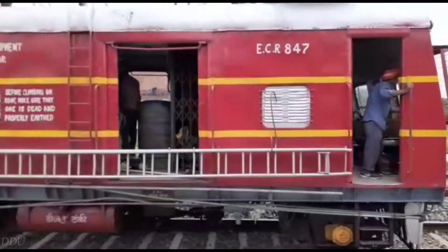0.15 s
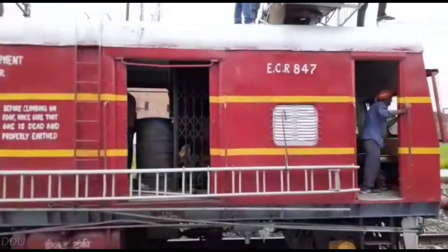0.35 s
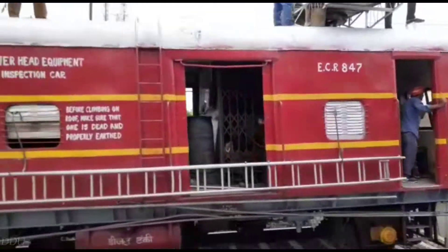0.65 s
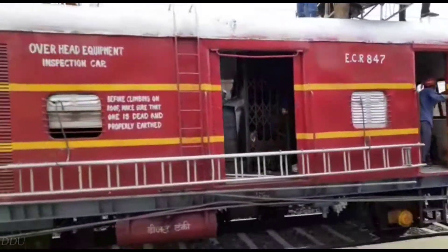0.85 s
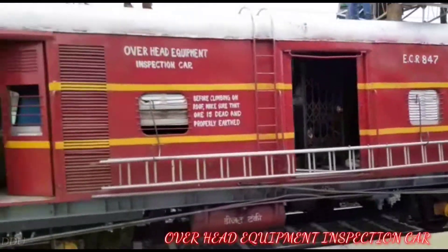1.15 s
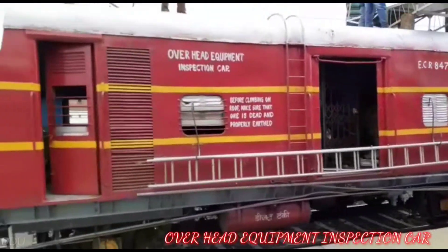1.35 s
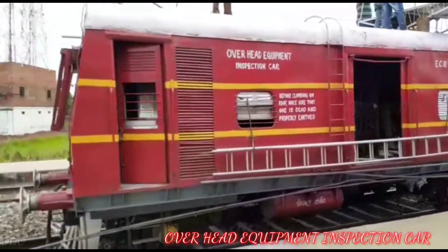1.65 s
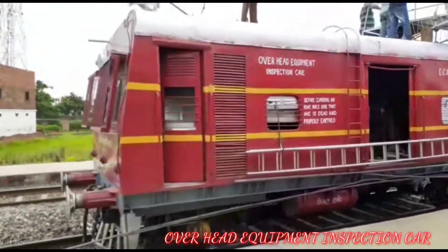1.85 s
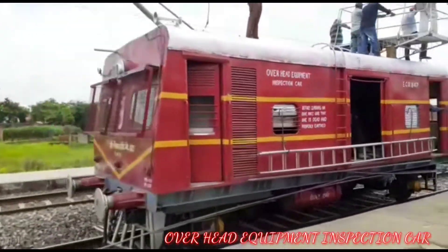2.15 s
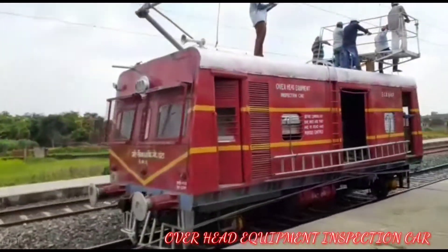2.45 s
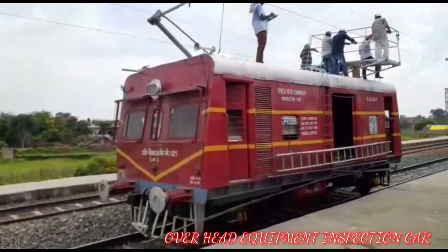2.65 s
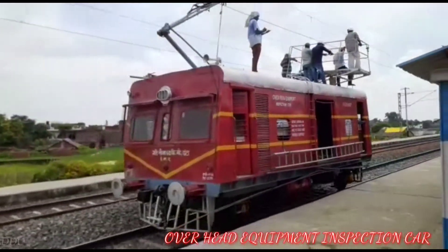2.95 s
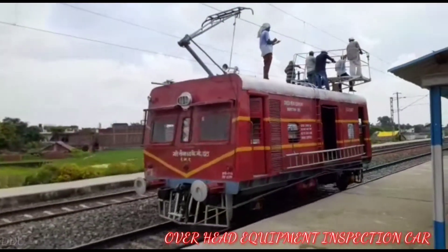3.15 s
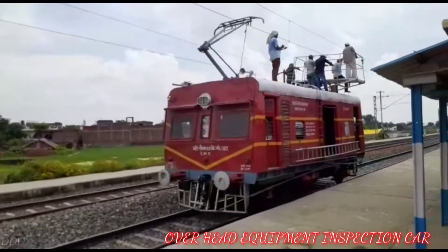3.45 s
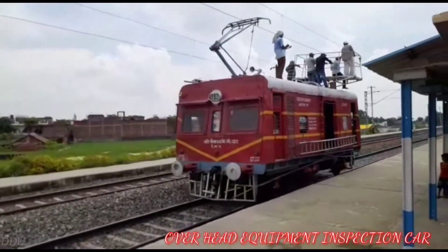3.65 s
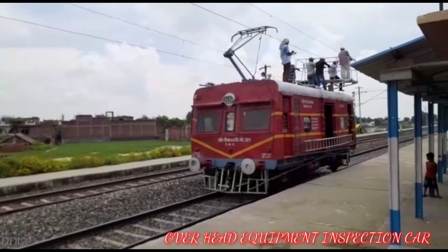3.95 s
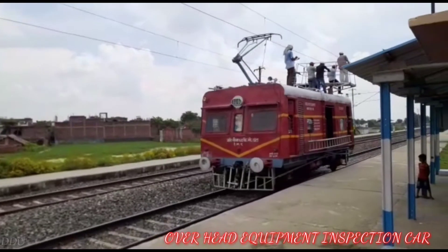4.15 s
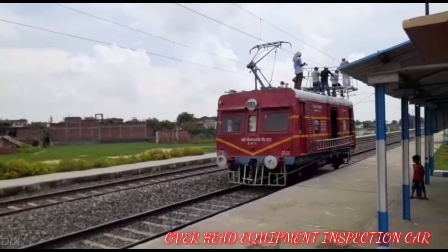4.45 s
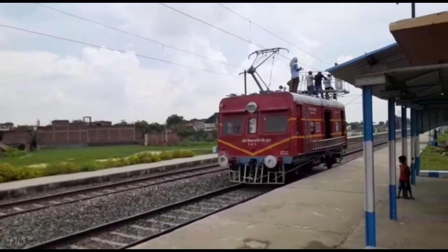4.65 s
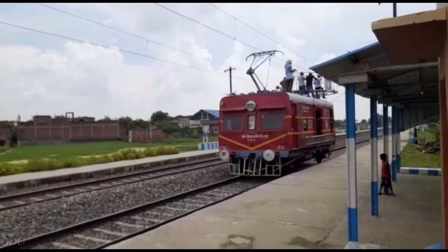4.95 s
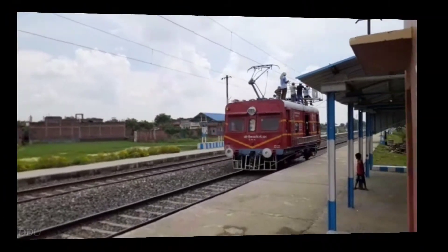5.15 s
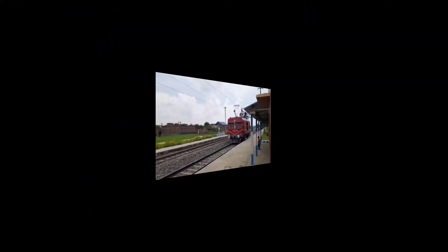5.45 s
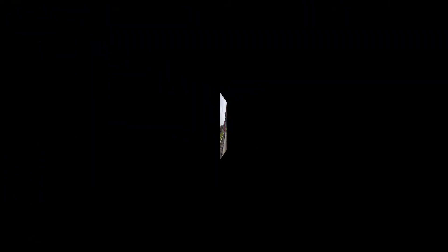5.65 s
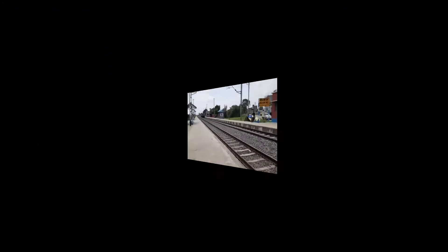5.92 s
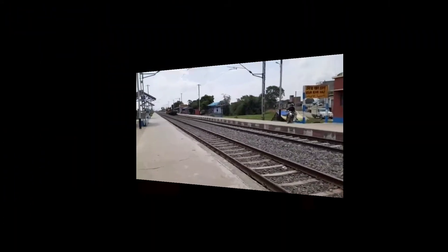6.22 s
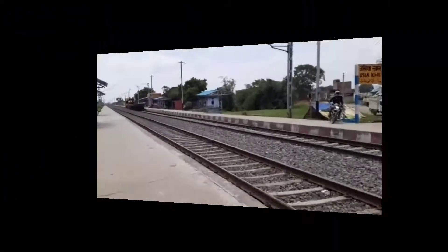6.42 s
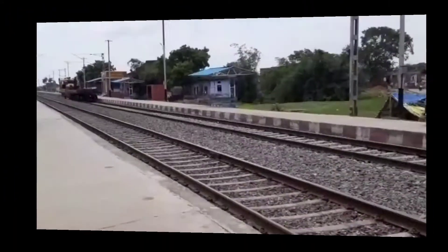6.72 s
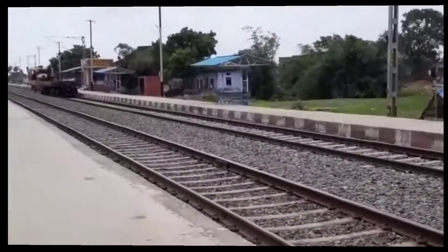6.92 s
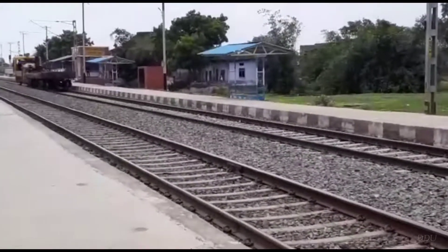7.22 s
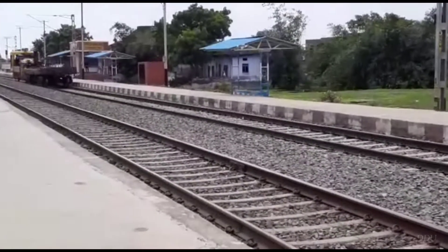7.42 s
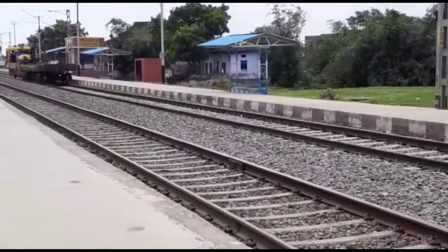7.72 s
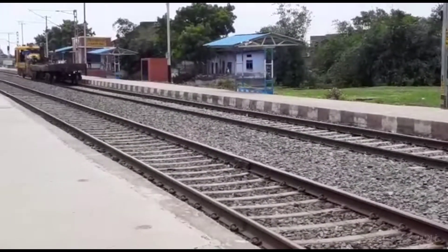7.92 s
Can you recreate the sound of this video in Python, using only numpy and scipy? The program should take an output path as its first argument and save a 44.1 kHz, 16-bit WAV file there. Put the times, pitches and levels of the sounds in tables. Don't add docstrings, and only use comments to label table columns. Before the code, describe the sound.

A diesel inspection vehicle passes very near small stereo microphones outdoors beside the rails: steady rapid firing throb, metallic panel roar, sliding wheel groan in the first second, irregular hissing air bursts. As it recedes, the chuffs thin out and light metallic ticks rattle over a cleaner bass hum. The sound fades out completely, then another track machine approaches from afar with sagging drones, lumpy roar and a brief puff of air.

```python
import sys
import numpy as np
from scipy import signal
from scipy.fft import rfft, irfft, next_fast_len
from scipy.io import wavfile
from scipy.ndimage import uniform_filter1d, map_coordinates

SR = 44100
rng = np.random.default_rng(int(sys.argv[2]) if len(sys.argv) > 2 else 0)


def materialize(psi):
    bounded = np.clip(np.atleast_2d(psi).T, -1, 1)
    quanta = np.round(bounded * 32767).astype(np.int16)
    wavfile.write(sys.argv[1], SR, quanta)


def volts_from_db(level):
    exponent = np.asarray(level, float) / 20
    return 10 ** exponent


N = 356328
CLOCK_S = np.arange(N) / SR
DROP_S, DROP_SAMPLES = 3.908, 1024


def unit(x):
    return x / np.sqrt(np.mean(x ** 2) + 1e-20)


def along(points, hz):
    f, v = np.transpose(points)
    return np.interp(np.log(hz + 1), np.log(f + 1), v)


def curves(rows):
    s, *columns = np.transpose(rows)
    gate = np.clip(np.minimum(CLOCK_S - s[0], s[-1] - CLOCK_S) / .03 + 1, 0, 1)
    return [np.interp(CLOCK_S, s, column) for column in columns] + [gate]


def bump(peak_s, width_s):
    return np.exp(-((CLOCK_S - peak_s) / width_s) ** 2)


def wobble(rate):
    return map_coordinates(rng.standard_normal(int(N * rate / SR) + 4), [np.arange(N) * rate / SR])


def filtered(x, response):
    m = next_fast_len(N + 8192)
    return irfft(rfft(x, m) * response(np.fft.rfftfreq(m, 1 / SR)), m)[..., :N]


def spread(pair, spectrum, alike, lean):
    def colour(hz):
        turn = np.arccos(np.clip(along(alike, hz), -1, 1)) / 2
        return volts_from_db(along(spectrum, hz)) * [np.cos(turn), np.sin(turn)]

    mid, side = filtered(pair, colour)
    stereo = np.array([mid + side, mid - side])
    return unit(filtered(stereo, lambda hz: volts_from_db(np.outer([.5, -.5], along(lean, hz)))))


def patchy(depth_db, size=512, count=5):
    z = signal.stft(rng.standard_normal((2, N)), nperseg=size)[2]
    field = uniform_filter1d(rng.standard_normal(z.shape[1:]), size=count, axis=0)
    field = uniform_filter1d(field, size=2 * count, axis=1)
    return signal.istft(z * volts_from_db(depth_db * unit(field)), nperseg=size)[1][:, :N]


def tone(hz, db, blur_hz, flutter_db):
    turns = np.cumsum(hz + blur_hz * wobble(25)) / SR
    return np.sqrt(2) * volts_from_db(db + flutter_db * wobble(14)) * np.sin(2 * np.pi * turns)


# pitch_hz, level_db (per Hz)
FAR_LOW = [(15, -49.5), (25, -18), (86, 1), (141, -9), (184, -6.5), (218, -15.5), (330, -8), (442, -16.5),
           (600, -19.5), (780, -44), (1320, -120)]
FAR_MID = [(260, -34), (450, -2.5), (530, -9), (680, -2.5), (894, 2), (1240, 0.5), (1340, 1.5),
           (1590, -3.5), (2260, -5.5), (2900, -16), (3770, -34), (6380, -120)]
FAR_UPPER = [(1470, -36), (2500, -7), (3560, -4), (4980, -4.5), (5560, -7.5), (7500, -23), (9750, -45),
             (16500, -120)]
FAR_TREBLE = [(3820, -31.5), (6500, -4), (7660, -6.5), (12100, 0.5), (15600, -7)]
# pitch_hz, left_right_likeness (-1 to 1)
FAR_ALIKE = [(60, 0.94), (130, 0.94), (290, 0.91), (640, 0.58), (1410, -0.1), (3100, -0.088), (6820, 0.06),
             (15000, -0.036)]
# pitch_hz, left_minus_right_db
FAR_LEAN = [(60, 1), (110, -1), (200, 0), (380, 0), (700, 1.5), (1290, 2), (2380, 1), (4400, 1.5),
            (8120, 7.5), (15000, -0.5)]


def far_roar():
    low = patchy(1.85, size=2048, count=2)
    out = volts_from_db(-32 + .8 * wobble(14)) * spread(low, FAR_LOW, FAR_ALIKE, FAR_LEAN)
    middle = patchy(2.2, size=1024, count=2)
    out += volts_from_db(-38 + 0.26 * wobble(18)) * spread(middle, FAR_MID, FAR_ALIKE, FAR_LEAN)
    out += volts_from_db(-48.5 + .8 * wobble(18)) * spread(patchy(2.1), FAR_UPPER, FAR_ALIKE, FAR_LEAN)
    puff_db = 5 * bump(7.08, .06)
    treble_db = -52.5 + puff_db + 1.1 * wobble(20)
    return out + volts_from_db(treble_db) * spread(patchy(1.5), FAR_TREBLE, FAR_ALIKE, FAR_LEAN)


# start_s, pitch_hz, level_db
THROB = [(5.9, 87, -37), (6.7, 85, -43), (7.2, 85.94, -38), (7.4, 91.8, -52), (7.56, 86.1, -33),
         (7.75, 86.5, -31), (7.86, 85.5, -48), (7.96, 84.1, -40), (8.08, 85, -41)]
# start_s, end_s, first_hz, last_hz,
# level_db
FAR_TONES = [
    (5.88, 7.4, 196, 143, -40),
    (6.04, 7.2, 349, 334, -38),
    (7.3, 8.6, 191, 155, -43),
    (5.94, 6.05, 1470, 1455, -39),
             (6.1, 7.1, 2292, 2260, -53),
    (6.1, 7.1, 4584, 4520, -64),
]


def far_drones():
    hz, db, _ = curves(THROB)
    tones = tone(hz, db, blur_hz=3, flutter_db=2.0)
    for start, end, first_hz, last_hz, db in FAR_TONES:
        done = np.clip((CLOCK_S - start) / (end - start), 0, 1)
        hz = first_hz + (last_hz - first_hz) * done ** 2.3
        swell = np.abs(4 * done * (1 - done)) ** .35
        tones += swell * tone(hz, db, blur_hz=.005 * first_hz, flutter_db=1 + first_hz / 1200)
    return tones * volts_from_db([[.6], [-.6]])


def far_machine():
    return far_roar() + far_drones()


def passing():
    abreast_db, leaves_s, recedes_per_s, spreading_db = -26.5, 0.99, 0.69, 19
    turns_s, turning_s = 1.8, 1.2
    away = np.maximum(CLOCK_S - leaves_s, 0) * recedes_per_s
    rumble_db = abreast_db - spreading_db * np.log10(1 + away ** 2)
    return rumble_db, np.clip((CLOCK_S - turns_s) / turning_s, 0, 1)


def casing_level():
    return passing()[0] - 0.5 + 2.5 * bump(2.03, 1.14)


# start_s, pitch_hz, level_db
GROAN = [(0, 294.7, -24.5), (.15, 226, -29), (.4, 276, -28.5), (.55, 307, -29), (.72, 320, -30),
         (.96, 318, -30), (1.02, 270, -40), (1.07, 250, -25), (1.17, 280, -30)]


def wheel_groan():
    hz, db, groaning = curves(GROAN)
    first = tone(hz, db, blur_hz=8, flutter_db=3)
    second = tone(1.25 * hz, db - 10, blur_hz=9, flutter_db=4)
    return groaning * (first + second)


# first_hz, last_hz, level_db (over the casing)
WHINES = [(820, 816, -16.5), (886, 1000, -15), (1773, 1870, -21.5), (2018, 2080, -22.5), (388, 395, -16),
          (1130, 990, -24.5), (1634, 1660, -24.5)]


def gear_whines():
    _, gone = passing()
    rise = np.clip(CLOCK_S / 2.8, 0, 1)
    out = np.zeros(N)
    for early_hz, late_hz, db in WHINES:
        hz = early_hz + (late_hz - early_hz) * rise
        out += tone(hz, casing_level() + db - 5 * gone, blur_hz=6, flutter_db=4.5)
    return out


# pitch_hz, level_db (per Hz)
RUMBLE = [(15, -33.5), (25, -13.5), (49, -9), (74, -15.5), (122, -4.5), (172, -9), (246, -11.5),
          (362, -9.5), (419, -13), (600, -24), (780, -57), (1320, -120)]
CASING = [(290, -31.5), (500, -10), (586, -8.5), (816, -2.5), (1060, -8), (1300, -8), (1440, -13),
          (1830, -12), (2200, -20.5), (2600, -25), (3380, -47), (5720, -120)]
CASING_BEHIND = [(290, -34), (500, -6.5), (586, -7.5), (783, 1), (983, -4), (1080, -8), (1380, -9.5),
                 (1910, -6.5), (2070, -19), (2600, -28), (3380, -42), (5720, -120)]
CLATTER = [(1350, -21.5), (2300, -1), (3930, -2), (4540, -3.5), (6040, -9), (6970, -7.5), (7800, -11),
           (10100, -24), (17200, -120)]
HISS = [(4120, -5), (7000, -3), (9430, 0), (12600, 2), (14900, -4.5), (15600, -8)]
# pitch_hz, left_right_likeness (-1 to 1)
ALIKE = [(60, 0.93), (130, 0.91), (290, 0.96), (640, 0.75), (1410, 0.27), (3100, -0.085), (6820, 0.0026),
         (15000, 0.02)]
# pitch_hz, left_minus_right_db
LEAN = [(60, 5), (110, 5.5), (200, 0), (380, 0), (700, 1), (1290, 1), (2380, 1), (4400, -6), (8120, -1),
        (15000, -4.5)]
CYLINDERS = [-9, -6, -7.5, -5, -8.5, -7.5]


def body(fired):
    rumble_db, gone = passing()
    clatter_db = rumble_db - 11 + 2.5 * gone
    hiss_db = rumble_db - 15.5 + 3.5 * gone
    cylinder = np.floor(fired - .25).astype(int)
    scatter_db = rng.normal(0, 2.3, size=500)[cylinder + 1]
    fade_db = 6.2 * ((fired - .25) % 1)
    knock = volts_from_db(np.array(CYLINDERS)[cylinder % 6] + scatter_db - fade_db)
    knock = unit(uniform_filter1d(knock, size=60))

    def beat(share):
        return 1 - share + share * knock

    floor = patchy(0.97, size=2048, count=2) * beat(.4)
    out = volts_from_db(rumble_db + 1.0) * spread(floor, RUMBLE, ALIKE, LEAN)
    panels = patchy(3.2, size=4096, count=2) * beat(.2)
    casing = (1 - gone) * spread(panels, CASING, ALIKE, LEAN)
    casing += gone * spread(panels, CASING_BEHIND, ALIKE, LEAN)
    out += volts_from_db(casing_level()) * casing
    out += volts_from_db(clatter_db + 5.0) * spread(patchy(2.0, count=3) * beat(0.25), CLATTER, ALIKE, LEAN)
    hiss = spread(patchy(1.8) * beat(0.6), HISS, ALIKE, LEAN)
    return out + volts_from_db(hiss_db + 5.0 + 1.4 * wobble(11)) * hiss


# start_s, level_db (peak)
TICKS = [(1.4542, -29), (1.4737, -31), (1.524, -31.5), (1.5645, -22.5), (1.773, -30.5), (2.2105, -34.5)]
LOOSE_DB = [-23, -24, -29, -24, -31, -31, -27, -26.5, -28, -28.5, -36, -39.5, -34.5, -29.5, -29.5, -27.5,
            -34, -28.5, -29.5, -28, -27, -39]
# start_s (middle), width_s, level_db
RATTLES = [
    (3.15, .075, 9),
    (5.0, .045, 9),
]
# pitch_hz, level_db (per Hz)
VALVE = [(3300, -42), (4000, -15.5), (4550, 0), (5100, -6.5), (5900, -36)]
VALVE_UPPER = [(5000, -35.5), (5500, 0.5), (5950, -8), (6800, -17), (8000, -40)]


def tick_times():
    loose_s, cycle_s, lost_s = 2.7782, .11375, DROP_SAMPLES / SR
    others_db, sink_db_per_s, scatter_db = [-31, -40, -32, -32, -33], 4.5, 3
    when = loose_s + cycle_s * np.arange(6 * len(LOOSE_DB)).reshape(-1, 6) / 6
    rattle_db = np.zeros(when.shape)
    for s, width, db in RATTLES:
        middle_s = s + (s > DROP_S) * lost_s
        rattle_db += db * np.exp(-((when - middle_s) / width) ** 2)
    peak = np.array([[db, *others_db] for db in LOOSE_DB])
    change_db = rattle_db - sink_db_per_s * (when - loose_s) + scatter_db * rng.standard_normal(when.shape)
    peak = peak + change_db * [0, 1, 1, 1, 1, 1]
    kept = (when < DROP_S) | (when > DROP_S + lost_s)
    heard_s = when - lost_s * (when > DROP_S)
    return [(s, db, -5) for s, db in TICKS] + list(zip(heard_s[kept], peak[kept], rattle_db[kept]))


def ticks():
    strikes, t = np.zeros((3, N + SR)), np.arange(SR // 40) / SR
    swell = (t / .003 * np.exp(1 - t / .003)) ** 2
    for s, db, bright_db in tick_times():
        upper_db = -8 + 0.88 * bright_db + 2.2 * rng.standard_normal()
        spit_db = -13 + bright_db / 2 - 4.5 * abs(s - 2.7782) + 2.2 * rng.standard_normal()
        levels = volts_from_db([[db - 7], [db + upper_db - 5], [db + spit_db]])
        strikes[:, round(s * SR):][:, :len(t)] += levels * swell
    lower, upper, spit = strikes[:, :N]
    right = [(4000, -12.5), (7000, -15.5)]  # (Hz, L-R dB)
    out = lower * spread(patchy(0.47), VALVE, [(4000, .3)], right)
    out += upper * spread(patchy(.6), VALVE_UPPER, [(4000, 0.4)], right)
    return out + spit * spread(patchy(.6), HISS, ALIKE, LEAN)


# start_s, level_db (peak)
CHUFFS = [(0.057, -23.5), (.172, -26), (0.2867, -25), (0.3423, -26.5), (.398, -23.5), (.6255, -19.5),
          (.6817, -27.5), (.7391, -23), (.9098, -27.5), (.9654, -17.5), (1.0219, -17), (1.0786, -18),
          (1.1925, -15.5), (1.2511, -24.5), (1.48, -21.5), (1.7065, -28), (1.8761, -27), (1.934, -22.5),
          (2.0492, -24), (2.3929, -26.5), (2.6234, -27), (2.6654, -24.5), (2.741, -26), (2.8504, -19.5),
          (3.1196, -20.5), (3.479, -28), (3.709, -30), (4.0243, -35.5), (4.3091, -42), (4.972, -35.5)]


def chuffs():
    high, mid, t = np.zeros(N + SR), np.zeros(N + SR), np.arange(SR // 5) / SR
    turn_s = .0568
    turns = .0575 + turn_s * np.arange(int(1.8 / turn_s))
    weak = list(zip(turns, passing()[0][(turns * SR).astype(int)] - 4))
    colour = -4 + 4 * rng.standard_normal(size=100)
    for (s, db), mid_db in zip(CHUFFS + weak, colour):
        onset = 1 - np.exp(-t / (0.0025 + 0.00063 * s))
        puff = onset * (volts_from_db(-60 * t / 0.027) + 0.58 * volts_from_db(-60 * t / 0.26))
        high[round(s * SR):][:len(t)] += volts_from_db(db - 5.5) * puff
        mid[round(s * SR):][:len(t)] += volts_from_db(db + mid_db - 16.0) * puff
    air = patchy(2.2, count=8)
    return high[:N] * spread(air, HISS, ALIKE, LEAN) + mid[:N] * spread(air, CLATTER, ALIKE, LEAN)


# start_s, firings_hz
FIRING = [(0, 53.14), (1.5, 53.12), (1.9, 52.8), (2.3, 52.67), (4.0, 52.66), (4.7, 52.6), (4.9, 52.3),
          (5.2, 52.4), (5.3, 52.7), (5.9, 52.7)]


def crank():
    rate = curves(FIRING)[0]
    leap = DROP_SAMPLES * rate[round(DROP_S * SR)] / SR
    return .07 + np.cumsum(rate) / SR + (np.arange(N) > DROP_S * SR) * leap


# start_s, level_db (firing tone over the rumble), second_db (second order over the firing tone)
EXHAUST = [(0, 3.5, 4), (.55, 5.5, 1.3), (.9, 1, 6), (1.2, 0, 7), (1.5, 3, 4), (2.4, 7, 3.5), (3, 12.5, -5),
           (3.6, 12.5, -7), (3.8, 10.5, -1.5), (4.1, 13, -3.5), (4.4, 15, 0.5), (5, 8.5, 3.5),
           (5.2, 14, -1), (5.7, 15, -4)]
# start_s, second_turns, third_turns
LEAD = [(0, .41, 0.051), (.9, 0.62, 0.11), (1.6, .36, 0.17), (3, .39, 0.052), (4.1, 0.25, 0.15),
        (4.8, .19, -0.034), (5.7, .3, .05)]
# multiple (of the firing rate), level_db (over the mean of firing tone and second order), #
UNEVEN = [(4 / 3, -8.5, -0.29), (5 / 3, -13, .35), (7 / 3, -17.5, .37), (8 / 3, -22.5, 0),
          (11 / 3, -23.5, 0), (4, -22, 0), (5, -28.5, 0), (6.3, -26, 0)]


def exhaust(fired):
    rumble_db, gone = passing()
    over_db, tilt_db, _ = curves(EXHAUST)
    first_db = rumble_db + over_db
    second_db = first_db + tilt_db
    echo_db = 5.5 * (1 - gone) * np.cos(2 * np.pi * (CLOCK_S - 0.9) / 2.2)
    third_db = rumble_db - 6.5 + 2.5 * CLOCK_S + echo_db
    second_turns, third_turns, _ = curves(LEAD)

    def order(k, db, turns):
        return np.sqrt(2) * volts_from_db(db) * np.cos(2 * np.pi * (k * fired + turns))

    out = order(1, first_db + 1.7, 0)
    out += order(2, second_db + 0.31 * wobble(8.9), second_turns + .015 * wobble(5.1))
    out += order(3, third_db + 0.89 * wobble(7.2), third_turns + 0.01 * wobble(4.9))
    for k, db, turns in UNEVEN:
        level_db = (first_db + second_db) / 2 + db + 1.3 * wobble(6.5)
        out += order(k, level_db, turns + 0.027 * k * wobble(2.5))
    out *= 1 - bump(DROP_S, 0.0011)
    return out * volts_from_db([[.25], [-.25]])


# start_s, level_db
FADER = [(3.6, 0), (4, -2.5), (4.5, -6.5), (5, -9), (5.2, -14), (5.35, -20), (5.5, -33), (5.7, -62),
         (5.76, -85), (5.83, -70), (5.87, -45.5), (5.95, -38.5), (6.5, -26), (6.9, -16.5), (7.3, -6),
         (7.6, -5), (8.08, 1)]


def scene():
    fired = crank()
    car = wheel_groan() + gear_whines() + body(fired) + ticks() + chuffs() + exhaust(fired)
    return volts_from_db(curves(FADER)[0]) * np.where(CLOCK_S < 5.76, car, far_machine())


def band_limit(x):
    return signal.sosfilt(signal.butter(12, 15720, fs=SR, output="sos"), x)


def record(dry):
    top_hz, mic_hz, edge_hz = 15720, 41.8, 15250
    heard = filtered(dry, lambda hz: (hz < top_hz) / np.sqrt(1 + (mic_hz / (hz + 1)) ** 6))
    lost = np.repeat(rng.random(size=N // 1024 + 2) < .42, 1024)
    lost = uniform_filter1d(np.roll(lost, 300) * 1., size=400)[:N]
    heard = heard - lost * filtered(heard, lambda hz: hz > edge_hz)
    return band_limit(heard)


dry = scene()
out = record(dry)
materialize(out)
```